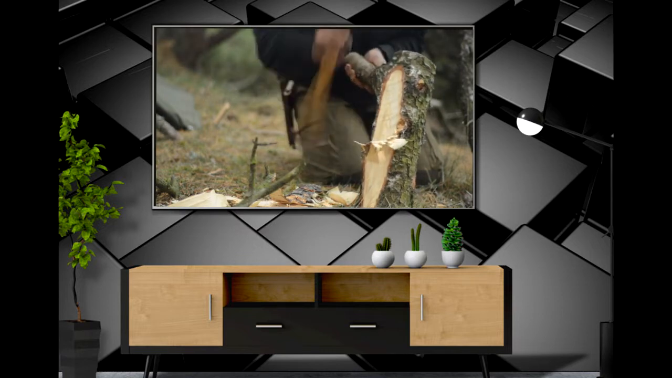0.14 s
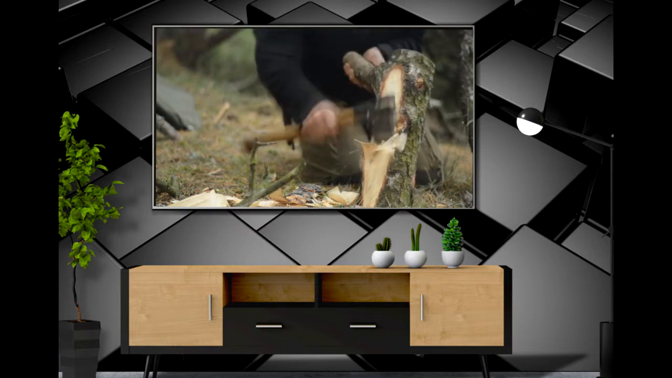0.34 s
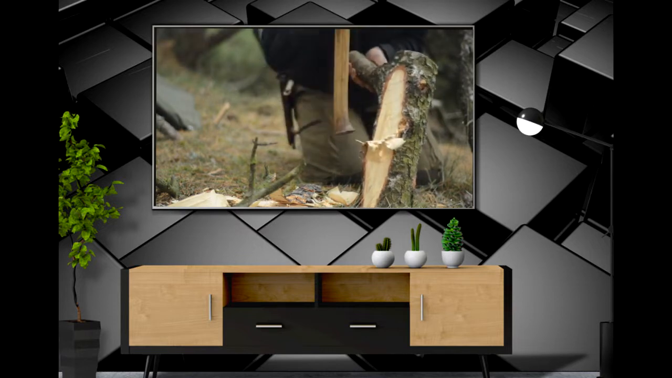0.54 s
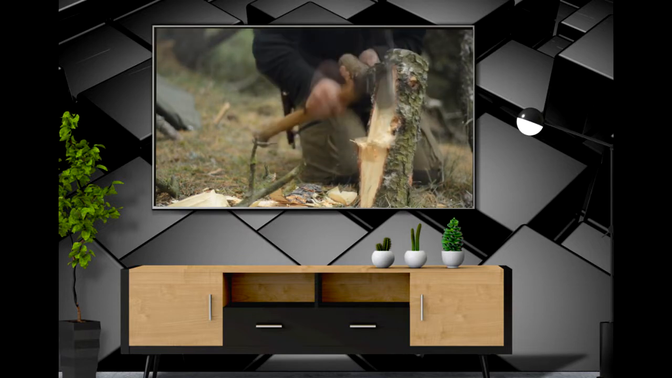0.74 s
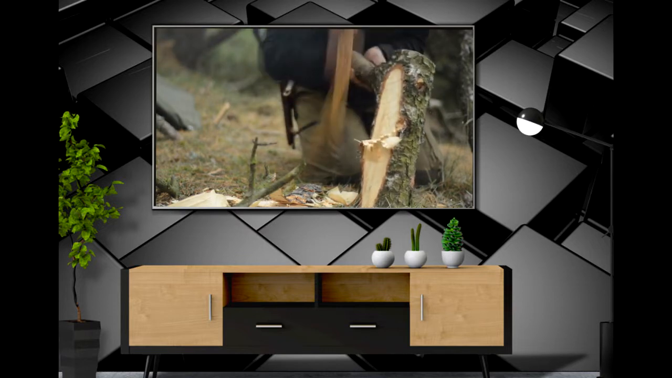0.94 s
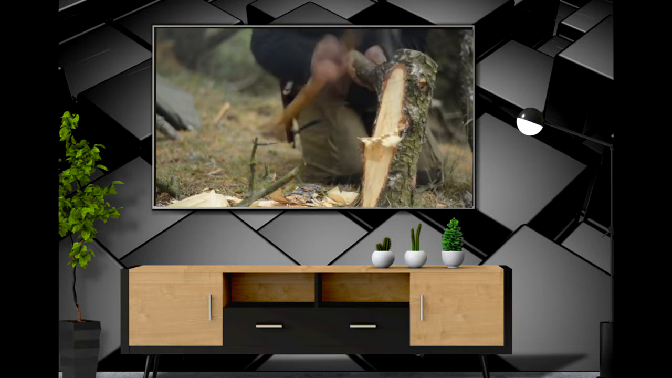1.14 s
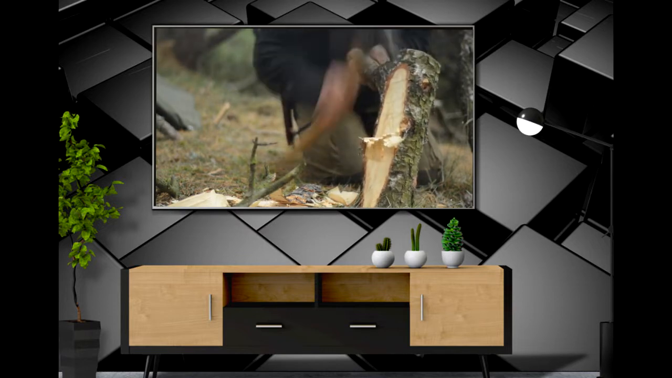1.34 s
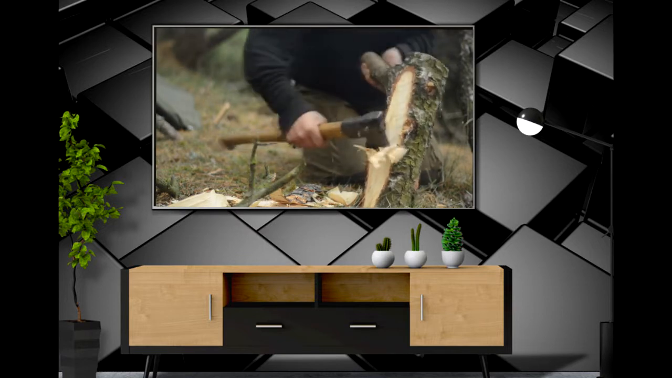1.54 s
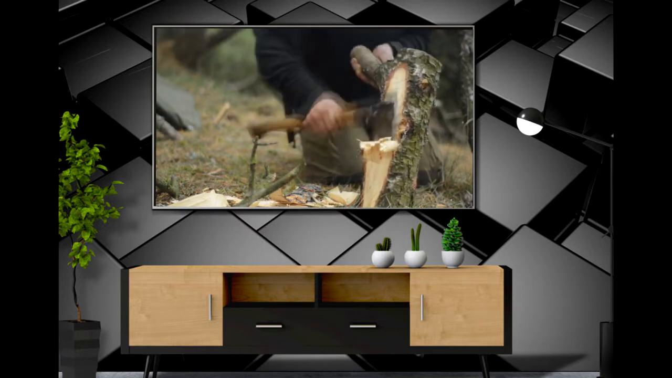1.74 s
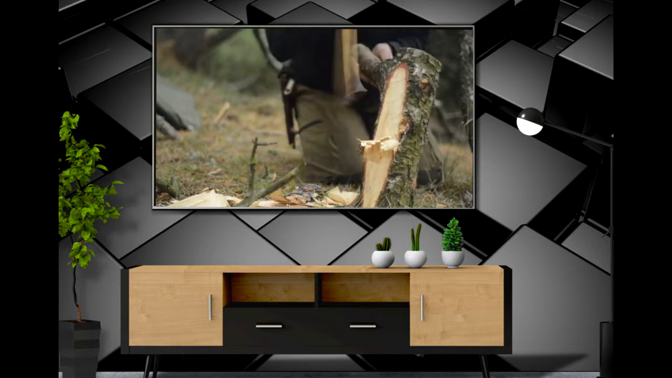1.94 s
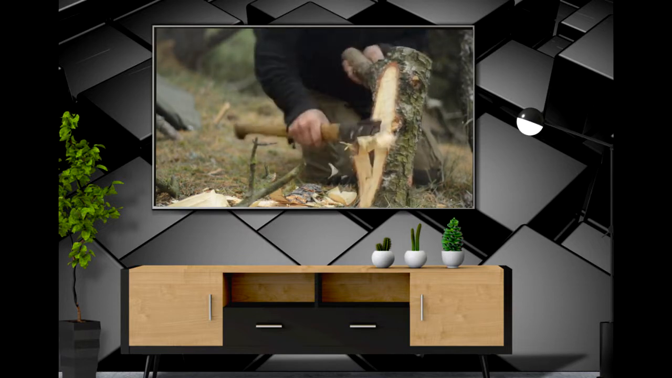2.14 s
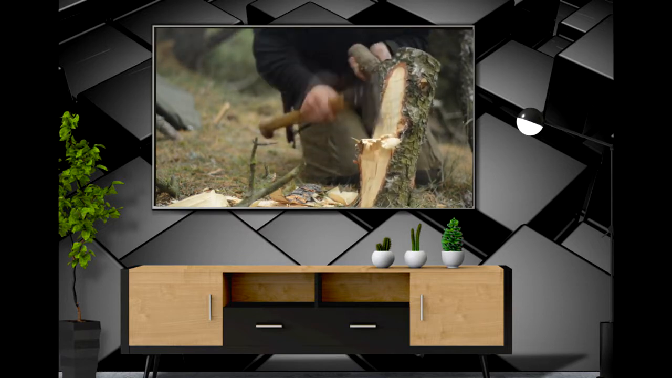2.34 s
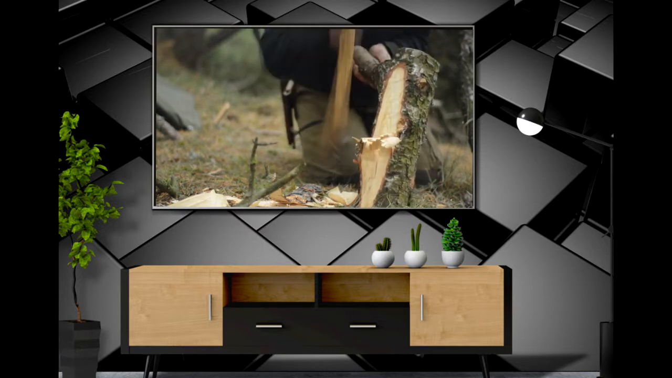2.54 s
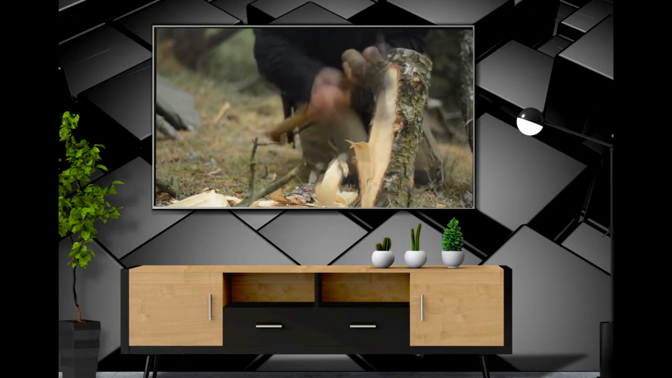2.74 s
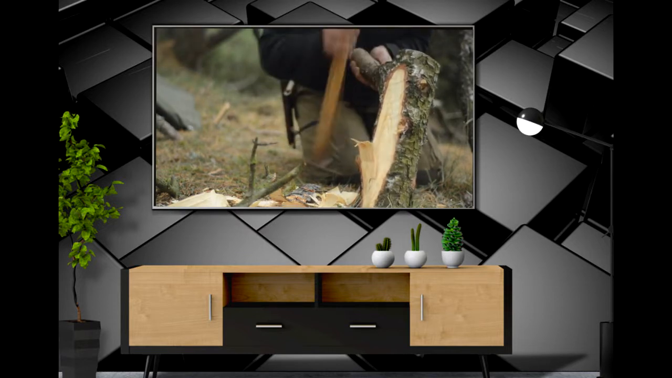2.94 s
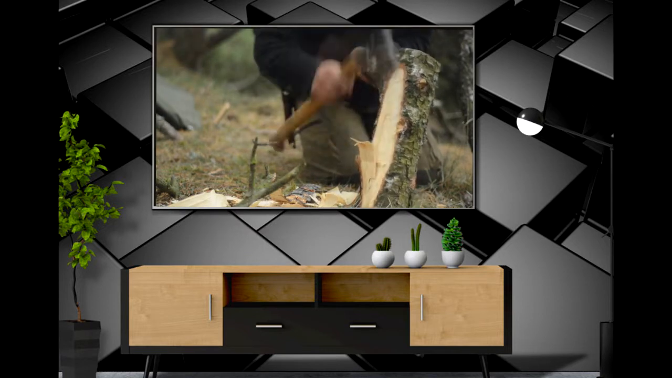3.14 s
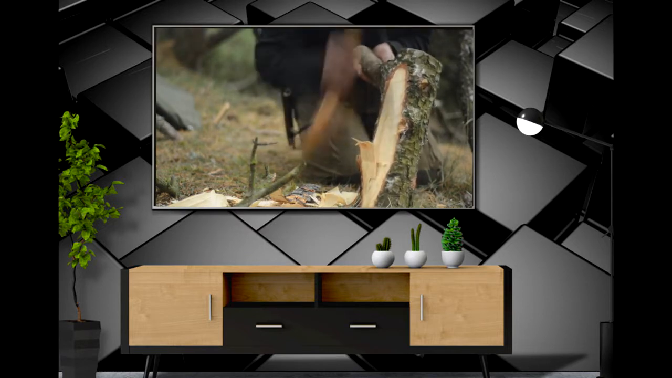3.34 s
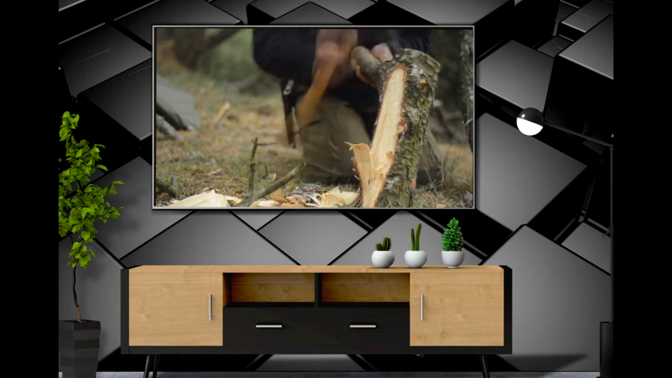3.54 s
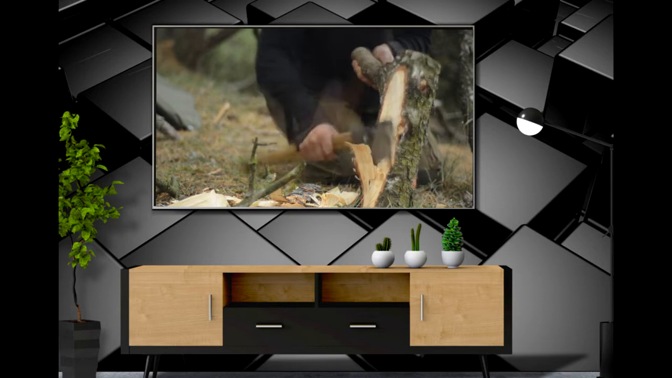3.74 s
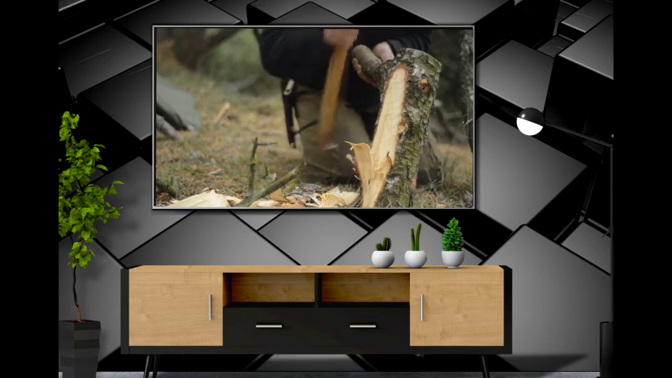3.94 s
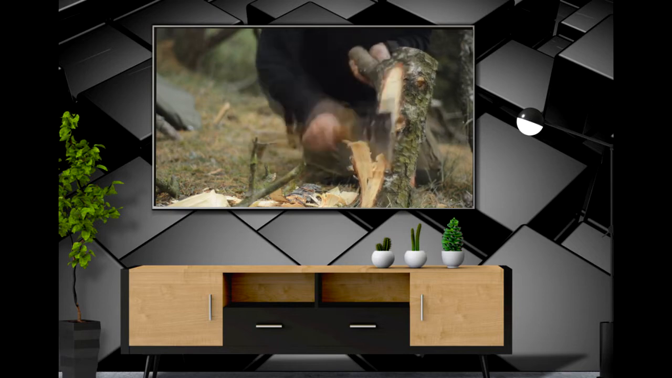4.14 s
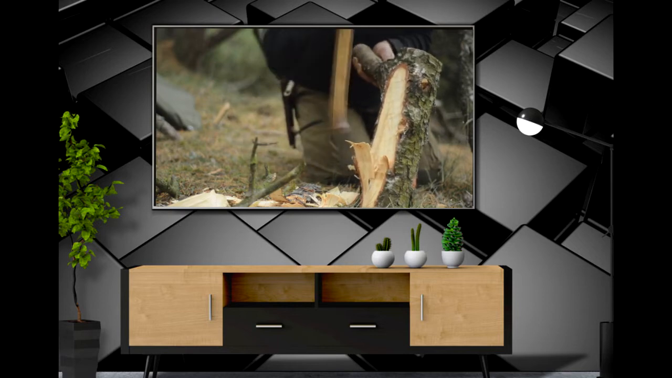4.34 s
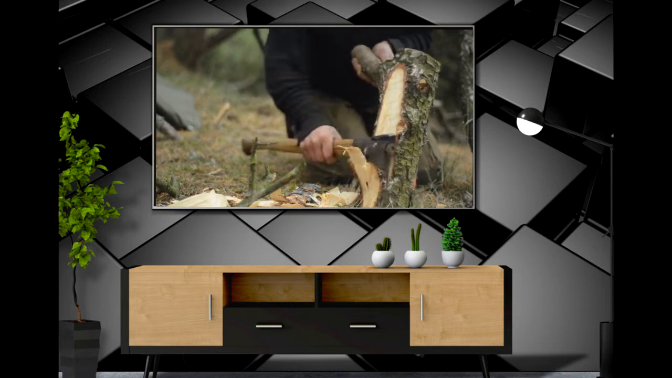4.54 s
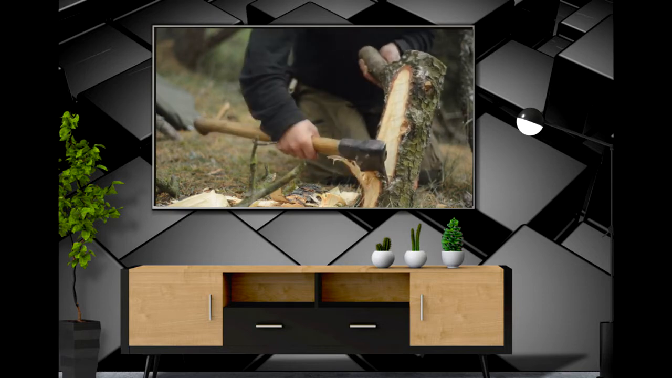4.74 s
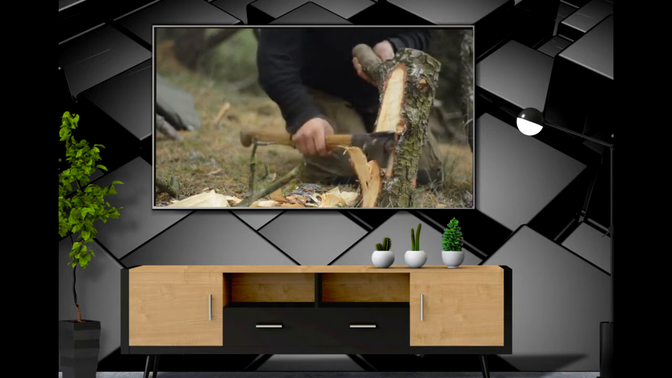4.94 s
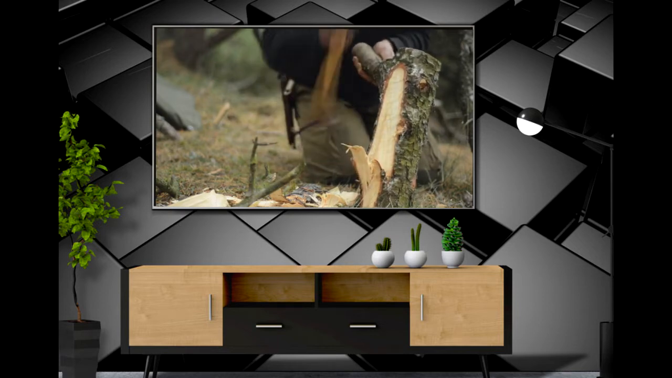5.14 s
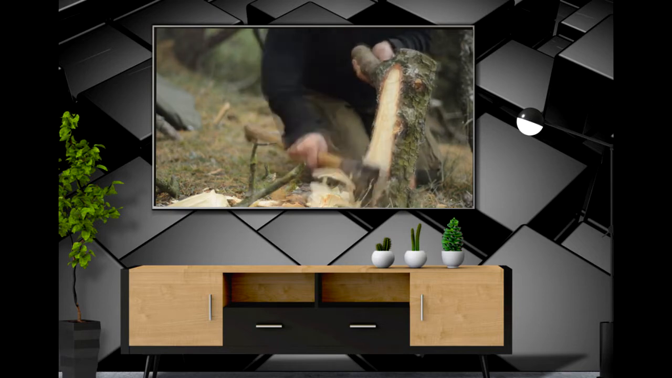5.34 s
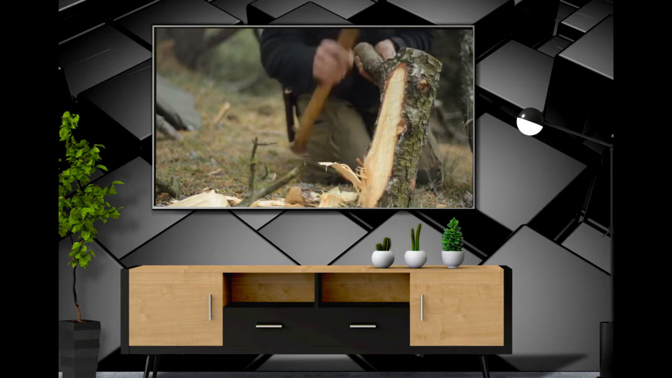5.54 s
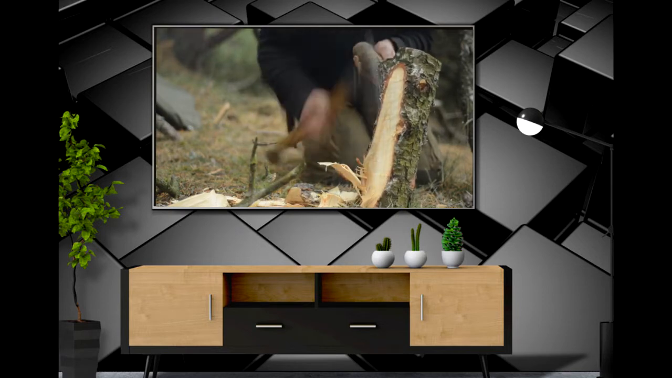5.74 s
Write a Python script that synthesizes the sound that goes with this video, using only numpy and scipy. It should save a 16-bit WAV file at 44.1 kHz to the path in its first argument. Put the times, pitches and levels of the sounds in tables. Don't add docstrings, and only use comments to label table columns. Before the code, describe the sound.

Close, mono outdoor sound of axe chopping: dry, bright cracks with a hollow log ring and short boom, slightly clipped. Splinters snap loudly on two mid-way blows, chips tick down onto dry leaves, and shavings rustle softly. A faint breeze and distant hush lie underneath. After a run of blows comes a short pause with clattering chips, then a final strong chop and quiet settling.

```python
import sys
import numpy as np
from scipy import signal
from scipy.fft import rfft, irfft
from scipy.io import wavfile
from scipy.ndimage import uniform_filter1d

SR = 44100
rng = np.random.default_rng(int(sys.argv[2]) if len(sys.argv) > 2 else 0)


def transcribe(u):
    v = np.clip(np.atleast_2d(u).T, -1, 1)
    q = np.round(v * 32767).astype(np.int16)
    wavfile.write(sys.argv[1], SR, q)


def boost(x):
    u = np.asarray(x, float) / 20
    return 10 ** u


N = 254898
LAG_S = .00783

# centre f/Hz, width/Hz, level/dB
LOG_BODY = [(605, 200, .5), (915, 260, 2.5)]
UPPER_RING = [(1518, 240, 4.5), (2030, 400, -3)]
TRUNK_BEND = [(291, 230, -5), (390, 190, -3)]
FINE_FIBRES = [(8200, 830, 0), (12500, 2400, -13)]


def unit(x):
    return x / np.sqrt(np.mean(x ** 2))


def resonate(x, modes):
    out = 0
    for k, (hz, width, db) in enumerate(modes):
        b, a = signal.iirpeak(hz, hz / width, SR)
        out = out + (-1) ** k * boost(db) * signal.lfilter(b, a, x)
    return out


def low_pass(x, order, hz):
    return signal.sosfilt(signal.butter(order, hz, fs=SR, output="sos"), x)


def colour(x, points):
    hz, db = np.transpose(points)
    f = np.arange(len(x) // 2 + 1) * SR / len(x) + 1
    gain = boost(np.interp(np.log(f), np.log(hz), db))
    return unit(irfft(rfft(x) * gain, len(x)))


def walk(rate):
    k = int(SR / rate)
    steps = np.repeat(rng.standard_normal(N // k + 1), k)
    return uniform_filter1d(uniform_filter1d(steps, k), k)[:N]


def grit(size, spread_db):
    return unit(rng.standard_normal(size) * boost(spread_db * rng.exponential(size=size)))


def fall(t, t60):
    return boost(-60 * np.maximum(t, 0) / t60) * (t >= 0)


def add(out, x, s):
    i = int(s * SR)
    out[i:i + len(x)] += x[:N - i]


def wood():
    # f/Hz, level/dB per Hz
    hush_colour = [(22, 6), (70, -6), (220, 0), (976, -14.5), (1400, -19), (4500, -27.5), (6500, -33.5),
                   (14000, -42)]
    # t/s, level/dB
    breeze_swells = [(0.0, -53), (0.4, -62), (0.7, -55), (1.4, -58), (1.82, -51), (2.14, -58), (2.32, -51),
                     (3.11, -72), (3.6, -58), (4.51, -64), (4.67, -50), (5.55, -51), (5.78, -70)]
    hush = colour(rng.standard_normal(N), hush_colour) * boost(-58.4 + .3 * walk(7.3))
    hush = low_pass(hush, 8, 13300)
    breeze = unit(resonate(rng.standard_normal(N), [(233, 660, -3), (516, 150, 0.5)]))
    breeze = low_pass(breeze, 2, 2500)
    swell_db = np.interp(np.arange(N) / SR, *np.transpose(breeze_swells))
    return hush + breeze * boost(swell_db - 8.5 + 3.0 * walk(8))


def rustle():
    # f/Hz, level/dB per Hz
    leaf_colour = [(530, -42.5), (900, -10), (1600, -1), (2800, -8), (4200, -10), (6400, -25), (8200, -21),
                   (16000, -50)]
    # middle t/s, level/dB, half length/s
    scuffs = [(.015, -58, .015), (.072, -62, .012), (.1, -60, .012), (.175, -67.5, .01), (.43, -53, .008),
              (.555, -65, .015), (1.047, -60, .008), (1.125, -48, .008), (1.412, -56, .01),
              (1.795, -57.5, .012), (1.823, -56, .012), (2.39, -58, .01), (2.85, -62, .012),
              (2.885, -63, .012), (2.925, -66, .014), (3.425, -57.5, .012), (3.51, -57.5, .006),
              (4.075, -56.5, .014), (4.148, -52, .012), (4.51, -58.5, .008), (4.70, -50.5, .006),
              (4.786, -46, .009), (4.9, -61, .015), (5.033, -60, .01), (5.22, -65.5, .012)]
    # loudest t/s, level/dB, dies by 60 dB in t/s
    shavings = [(1.0, -70, 1.5), (1.6, -52, .55), (2.46, -66, .9), (2.79, -61, .3), (4.70, -60, .4),
                (4.76, -51, .12), (4.87, -62, .4), (4.94, -57, .2), (5.06, -70, .2), (5.52, -56, .35),
                (5.7, -70, 2.5)]
    t = np.arange(N) / SR
    brushes = np.zeros(N)
    for s, db, half in scuffs:
        brushes += boost(db) * np.exp(-((t - s) / half) ** 2)
    showers = np.full(N, boost(-78))
    rise_t60 = .35
    for s, db, t60 in shavings:
        showers += boost(db - 60 * np.maximum((s - t) / rise_t60, (t - s) / t60))
    patches = boost(4 * walk(60))
    return colour(grit(N, 2.5), leaf_colour) * (patches * showers + brushes)


def face_ring(t, push, contact, ring_hz):
    turns = np.cumsum(ring_hz * (1 - .55 * np.exp(-t / .0015))) / SR
    loudness = 0.34 * fall(t - contact, 0.015) + 0.26 * (t < contact)
    ring = np.sin(2 * np.pi * turns) * loudness
    return ring + .5 * resonate(push, [(ring_hz, 120, 0)]) - boost(-6.5) * resonate(push, UPPER_RING)


def fibre_crack(split, treble_db):
    # centre f/Hz, width/Hz, level/dB
    coarse_fibres = [(2640, 500, 2), (4020, 1500, -1.5)]
    return resonate(split, coarse_fibres) + boost(treble_db) * resonate(split, FINE_FIBRES)


def overload(x, bite, over_db, swing_db):
    x = np.tanh(boost(over_db) * x / np.abs(x).max())
    x *= (1 - 0.48 * np.exp(-t_of(x) / .004)) * (0.24 + 0.89 * bite)
    return x / np.abs(x).max() - boost(swing_db) * uniform_filter1d(bite, size=200)


def t_of(x):
    return np.arange(len(x)) / SR


def blow(t, solid, weight, crack_db, contact, ring_hz, fine_db):
    bite = fall(t - contact, 0.017) + (t < contact)
    push = grit(len(t), 1.8) * bite + 6.13 * np.exp(-t / .0004)
    ring = face_ring(t, push, contact, ring_hz)
    knock = resonate(push, LOG_BODY) - boost(-3.5 - .55 * weight) * resonate(push, TRUNK_BEND)
    fibres = fibre_crack(grit(len(t), 1.6) * bite, -8 + .7 * fine_db)
    x = ring + boost(-3.5 - .4 * solid) * knock + boost(crack_db - 1.5) * fibres
    return overload(x, bite, 8 + 1.15 * solid, -29 + .9 * weight)


def log_boom(t):
    tones = np.sin(2 * np.pi * 112 * t) + .6 * np.sin(2 * np.pi * 165 * t)
    boom = tones * fall(t, .08) * (1 - np.exp(-t / .003))
    dull = resonate(rng.standard_normal(len(t)), [(167, 120, 7.7)] + TRUNK_BEND + LOG_BODY)
    dull = low_pass(unit(dull) * fall(t, 0.18), 2, 5000)
    return 1.25 * boom + 0.3 * dull


def ground_thump(t):
    late = np.maximum(t - .025, 0) / 0.026
    rumble = unit(resonate(rng.standard_normal(len(t)), [(60, 120, 0)]))
    shake = np.sin(2 * np.pi * 48 * t) + .35 * rumble
    return shake * late * np.exp(1 - late)


def returned_ring(t, face_db, trunks_db):
    scatter = low_pass(rng.standard_normal(len(t)), 2, 5000)
    swell = 1 - np.exp(-t / .003)
    trunks = unit(resonate(resonate(scatter, [(1260, 90, 0)]), [(1280, 200, 0)]))
    trunks = trunks * (.65 * fall(t, .75) + 2.2 * fall(t, .2)) * swell
    face = unit(resonate(scatter, [(1330, 240, 4)] + UPPER_RING)) * fall(t, .17) * swell
    return boost(face_db) * face + boost(trunks_db) * trunks


def tearing(t, stop, treble_db):
    # f/Hz, level/dB per Hz
    tear_colour = [(350, -45.5), (600, -16.5), (1330, -6.5), (1570, -9), (3630, -8.5), (5710, -17.5),
                   (8270, -23.5), (16000, -50)]
    tear = colour(grit(len(t), 2.4), tear_colour)
    soft = low_pass(tear, 4, 5000)
    release_db = -9.0 / (1 + np.exp((stop - t) / .008))
    fits = fall(t, .12 + 2.1 * stop) * boost(2.6 * walk(70)[:len(t)] + release_db)
    return (soft + boost(treble_db) * (tear - soft) * fall(t, 0.44)) * fits


def axe():
    # t/s, near microphone level/dB, far microphone level/dB,
    # how solidly the cut face rings/dB, weight driven into the trunk/dB
    blow_list = [(.3770, -22, -4, -38, -25), (0.7228, -11.5, -7, -27, -21), (1.0635, -8, -8, -28, -18),
                 (1.4280, -14, -5, -29, -19), (2.1381, -10.5, -4, -38, -28), (2.6870, -13, -8.5, -50, -31),
                 (3.0782, -42, -6.5, -30, -20), (3.4399, -5, -9.5, -31, -30), (3.8053, -7.5, -6, -38, -24),
                 (4.1647, -20, -3, -36, -15), (4.5165, -23, -4.5, -32, -29), (5.3850, -13, -1.5, -39, -35)]
    # blade contact/s, crack level/dB, tearing level/dB,
    # free after t/s, fineness of the fibres/dB
    splinter_list = [(.005, -11, -46, .05, 6), (.0052, -15.5, -37, .06, -6), (.006, -6, -36.5, .088, -5),
                     (.0075, -15, -33, .06, .5), (.006, -6, -31, .11, -3), (.014, -5, -29.5, .08, 4),
                     (.0091, -17, -34, .06, -3), (.0069, -13, -35.5, .082, 3.5),
                     (.0055, -14, -44.5, .064, -1), (.0055, -6, -37, .06, 1), (.0085, -9, -35, .065, 1.5),
                     (.0085, -3, -30.5, .074, 1.5)]
    out, t = np.zeros(N), np.arange(SR // 2) / SR
    for hit, splinter in zip(blow_list, splinter_list):
        s, near_db, far_db, face_db, boom_db = hit
        contact, crack_db, tear_db, stop, fine_db = splinter
        solid, weight = face_db + 34, boom_db + 24
        ring_hz = 1290 - 11 * s
        x = blow(t[:SR // 10], solid, weight, crack_db, contact, ring_hz, fine_db)
        add(out, boost(near_db) * x, s)
        add(out, boost(far_db) * x, s + LAG_S)
        after = boost(boom_db) * log_boom(t)
        after += boost(-45.5 + .4 * weight) * ground_thump(t)
        after += returned_ring(t, face_db, -51 + 1.3 * solid)
        after += boost(tear_db) * tearing(t, stop, fine_db)
        add(out, after, s + LAG_S)
    return out


def chips():
    # t/s, peak level/dB, centre f/Hz, far microphone level/dB
    chip_list = [(.52, -60, 6500, -20), (.986, -45, 7800, 1.5), (.9865, -44, 2900, 1),
                 (1.413, -40, 3550, -8), (1.554, -46, 6500, -12), (1.581, -33, 6300, -7),
                 (1.586, -31, 1670, -10), (1.640, -50, 7950, -12), (1.764, -57, 4500, -12),
                 (1.889, -54, 4000, -8), (2.371, -42, 3700, -1), (2.785, -52, 8000, -8),
                 (3.419, -50, 2970, -14), (3.652, -53, 4500, -13), (3.855, -44, 3500, -10),
                 (4.676, -60, 7540, -7), (4.714, -35, 3146, -1), (4.7305, -29, 7900, -6),
                 (4.7315, -33, 3000, -8), (4.747, -30, 4500, -2), (4.7752, -18, 3140, -0.5),
                 (4.854, -49, 7500, -20), (4.912, -50, 7950, -20), (4.9313, -25, 2740, -1),
                 (4.950, -30.5, 3500, -24), (5.051, -45.5, 4740, -9), (5.521, -45, 4440, -1),
                 (5.569, -41, 1720, -13), (5.571, -45, 2920, -10), (5.71, -56, 8140, -17)]
    out, t = np.zeros(N), np.arange(SR // 20) / SR
    for s, db, hz, far_db in chip_list:
        t60 = min(60 / hz, .014)
        treble_db = -13 + 4 * np.log2(hz / 4000) - .55 * (db + 45)
        snap = (rng.standard_normal(len(t)) + 7.0 * (t == 0)) * fall(t, t60)
        pitch = resonate(resonate(snap, [(hz, .6 * hz, 0)]), [(hz, .8 * hz, 0)])
        body = resonate(snap, [(1700, 900, 0)])
        treble = resonate(resonate(snap, FINE_FIBRES), [(8700, 4500, 0)])
        x = pitch + .45 * body + boost(treble_db) * treble
        x *= boost(db) / np.abs(x).max()
        add(out, x, s)
        add(out, boost(far_db) * x, s + LAG_S)
    return out


def snaps():
    # t/s, peak level/dB, f/Hz, dies by 60 dB in t/s
    snap_list = [(2.1415, -14, 1520, .012), (2.1493, -5, 1600, .012), (2.1535, -10, 2300, .02),
                 (2.157, -20, 700, .04), (2.6895, -15.5, 3086, 0.014), (2.6975, -5.5, 2989, .016),
                 (2.7002, -19, 7510, .006), (2.7055, -5, 4150, 0.0033), (2.7071, -9.5, 7740, 0.0081),
                 (2.7142, -23, 4930, 0.0071), (2.7182, -22.5, 345.6, 0.022), (5.4172, -15, 1900, .005),
                 (5.4178, -12, 300, .024), (2.942, -45, 380, 0.063)]
    out, t = np.zeros(N), np.arange(SR // 10) / SR
    for s, db, hz, t60 in snap_list:
        rough = 1 + 0.44 * rng.standard_normal(len(t)) * min(hz / 4000, 1)
        add(out, boost(db) * rough * np.sin(2 * np.pi * hz * t) * fall(t, t60), s)
    return out


def scene():
    return (wood() + rustle() + axe() + chips() + snaps())[None]


def top_cut(x):
    return signal.sosfilt(signal.butter(12, 16800, fs=SR, output="sos"), x)


def record(dry):
    x = dry - .5 * resonate(dry, [(5650, 600, 0)])
    x = x - .4 * resonate(dry, [(6900, 300, 0)])
    x = x + .15 * resonate(dry, [(8200, 1200, 0)])
    x = signal.sosfilt(signal.butter(1, 15, "high", fs=SR, output="sos"), x)
    size = np.abs(x)
    rounded = np.sign(x) * (.6 + .3 * np.tanh((size - .6) / .3))
    x = np.where(size < .6, x, rounded)
    return top_cut(low_pass(x, 10, 14800))


dry = scene()
out = record(dry)
transcribe(out)
```